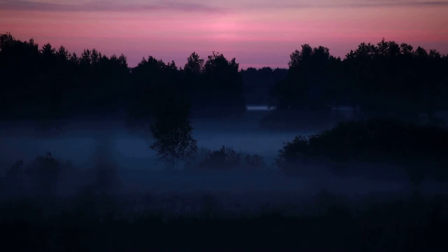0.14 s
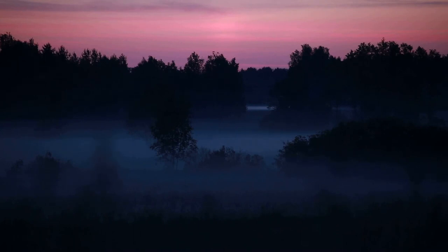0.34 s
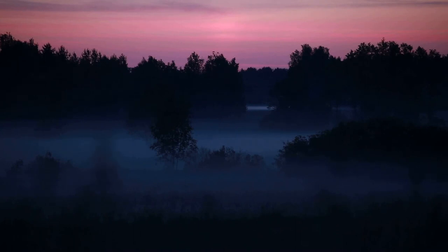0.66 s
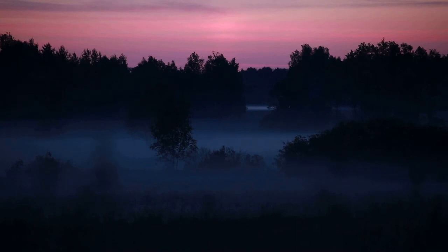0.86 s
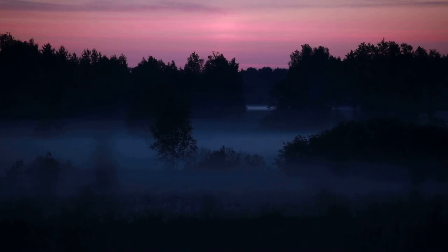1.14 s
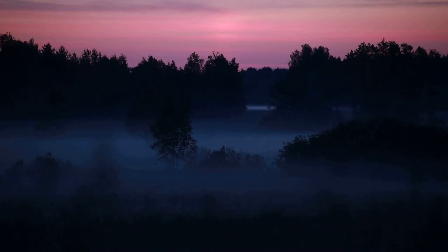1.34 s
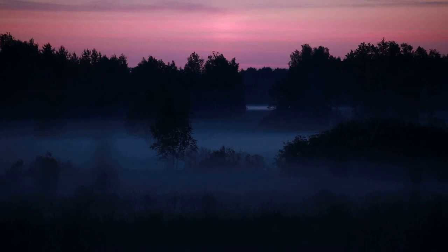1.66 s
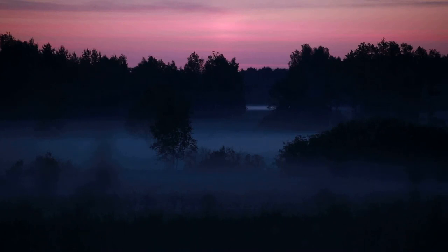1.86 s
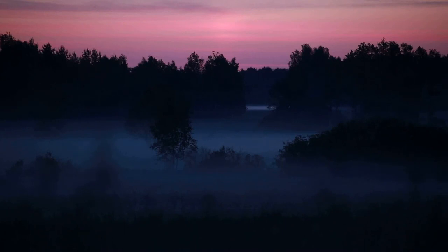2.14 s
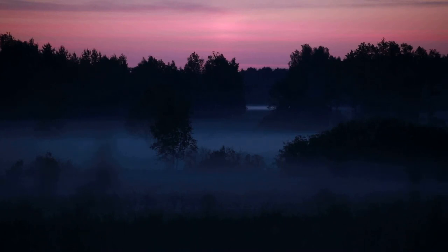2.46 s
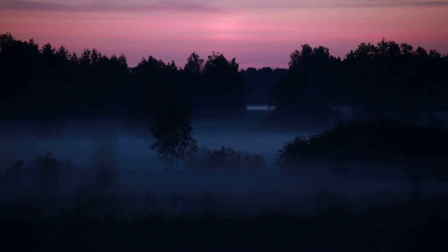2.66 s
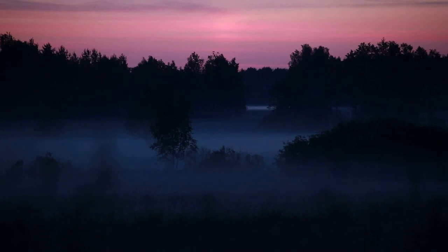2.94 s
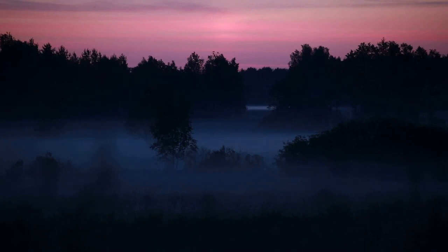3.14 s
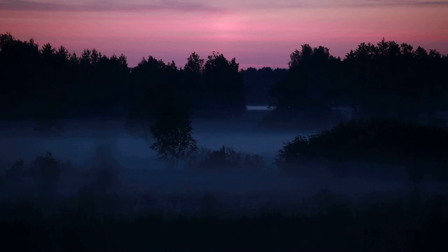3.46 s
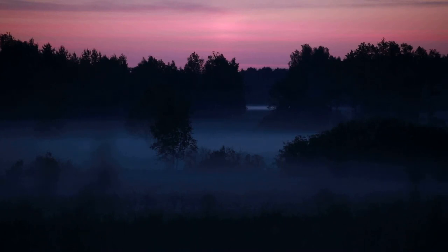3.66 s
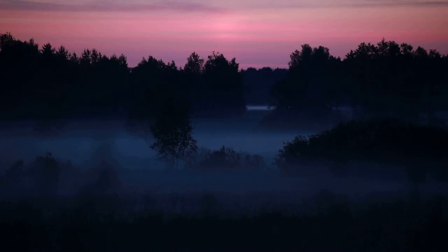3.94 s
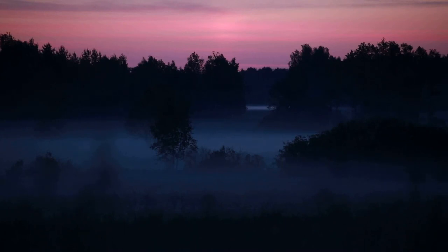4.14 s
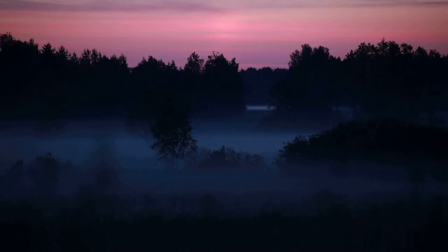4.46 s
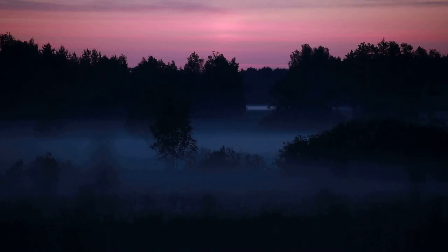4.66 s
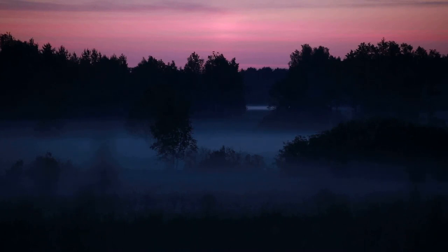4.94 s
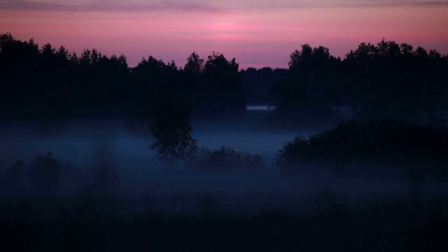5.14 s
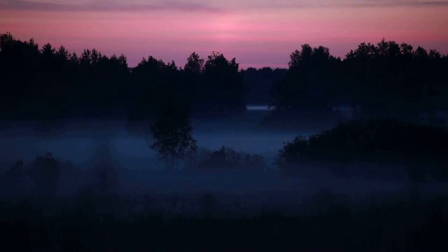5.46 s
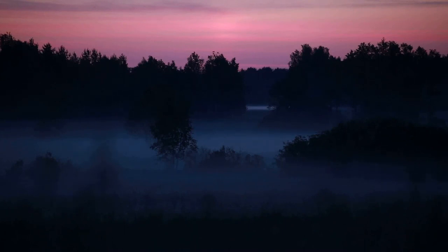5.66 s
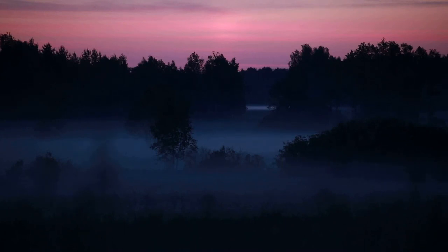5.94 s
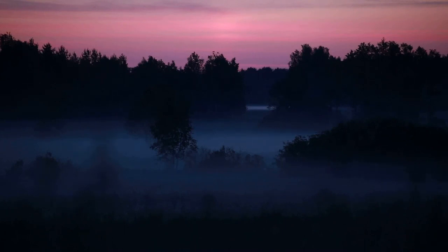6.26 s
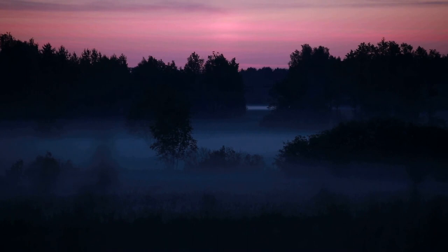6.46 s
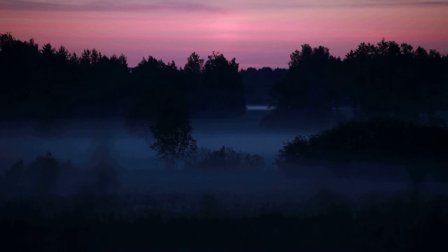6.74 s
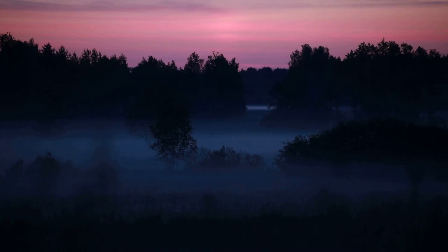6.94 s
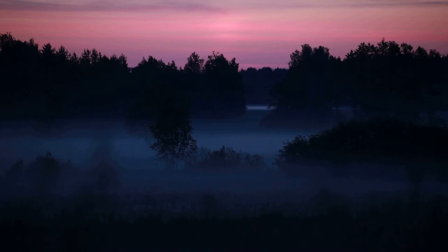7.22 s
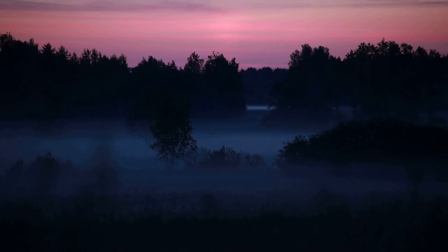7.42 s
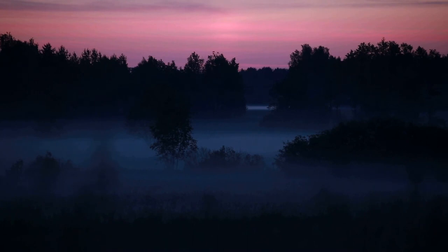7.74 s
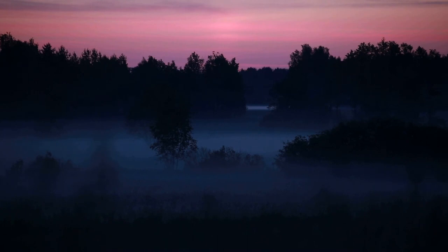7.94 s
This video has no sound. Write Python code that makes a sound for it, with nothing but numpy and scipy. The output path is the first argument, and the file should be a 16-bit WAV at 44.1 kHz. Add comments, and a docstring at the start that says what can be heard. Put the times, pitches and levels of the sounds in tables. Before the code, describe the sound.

A dense dawn chorus of many birds chirping, whistling and trilling over a misty meadow, with frogs ticking faintly beneath and soft airy hiss.

```python
"""Dawn chorus over a meadow ringed by trees, heard through one microphone.
Throughout, land rumble and hiss (shaped noise) lie under a blur of far birds (chance notes in a long echo)
and ticking frogs (resonant clicks); near birds whistle and chirp (gliding sines) from the start.
Thin buzzes join at 0.5 s, falling trills at 1.8 s, scooped notes at 3.2 s, low repeated notes at 4 s and
faint pipes at 4.1 s; sinking pairs of chirps and a near frog's clicks come just before 7 s, then a throb."""
import sys
import numpy as np
from scipy import signal
from scipy.fft import rfft, irfft
from scipy.io import wavfile

SR = 44100
rng = np.random.default_rng(int(sys.argv[2]) if len(sys.argv) > 2 else 0)


def volts_from_decibels(level):
    """Turn decibel levels (scalar or array-like) into linear amplitude factors."""
    exponent = np.asarray(level, float) / 20
    return 10 ** exponent


def generate_wav(sig):
    """Save sig (samples, or channels by samples) to the path in sys.argv[1] as 16-bit PCM at SR."""
    pcm = np.round(np.clip(np.atleast_2d(sig).T, -1, 1) * 32767).astype(np.int16)
    wavfile.write(sys.argv[1], SR, pcm)


N = 356769   # samples


def coloured(x, points):
    """Linear filtering: multiplies the spectrum by a gain drawn on a log-frequency axis."""
    hz, db = np.transpose(points)
    grid_hz = np.arange(N // 2 + 1) * SR / N + 1   # 1 Hz up, to keep the logarithm finite
    gain_db = np.interp(np.log(grid_hz), np.log(hz), db)
    return irfft(rfft(x) * volts_from_decibels(gain_db), N)


def rms_one(x):
    """Normalisation: scales a signal to unit mean power."""
    return x / np.sqrt(np.mean(x ** 2) + 1e-20)


def drift(n, rate):
    """Slow random modulation: normal deviates, rate a second, joined by straight lines."""
    knots = rng.standard_normal(int(n * rate / SR) + 2)
    return np.interp(np.arange(n) * rate / SR, np.arange(len(knots)), knots)


def add(out, start_s, sound):
    """Superposition: sums a sound into the mix from a given moment."""
    at = np.arange(len(sound)) + round(start_s * SR)
    inside = (at >= 0) & (at < N)
    out[at[inside]] += sound[inside]


def syrinx(hz, overtone_db):
    """Frequency modulation: a bird's voice is almost a sine of moving pitch, with a faint octave."""
    phase = 2 * np.pi * (np.cumsum(hz) / SR + rng.random())
    return np.sin(phase) + volts_from_decibels(overtone_db) * np.sin(2 * phase)


def echoes(x, t60_s):
    """Diffuse reverberation: trunks and leaves scatter sound back as a dense, exponentially dying wash."""
    t = np.arange(int(t60_s * SR)) / SR
    onset = np.minimum(t / 0.005, 1)
    wash = rng.standard_normal(len(t)) * volts_from_decibels(-60 * t / t60_s) * onset
    unit_energy = wash / np.sqrt(np.sum(wash ** 2))
    return signal.fftconvolve(x, unit_energy)[:N]


def air():
    """Stationary noise: one smooth spectrum holds land rumble, blurred song and microphone hiss."""
    # relative spectrum of the steady noise: pitch_hz [Hz], density_db [dB per Hz]
    air_colour = [(21, -38), (37, -4), (105, -1), (407, -5.5), (1250, -5.5), (1940, -3.5), (3150, -2),
                  (4390, -6.5), (5520, -16), (6270, -20), (7310, -22.5), (13900, -19.5), (15700, -16)]
    noise = coloured(rng.standard_normal(N), air_colour)
    return volts_from_decibels(-53.5) * rms_one(noise)


def far_chorus(count=1500, wet_db=-2.5, gain_db=-1.5):
    """Random superposition: a swarm of chance notes, dulled by distance and half lost in echo."""
    # overall far level before gain_db: time_s [s], level_db [dB rms]
    far_level = [(0, -51.5), (2, -50), (4, -50.5), (6, -54), (8.09, -54.5)]
    # spectral gain of the distant song: pitch_hz [Hz], gain_db [dB]
    far_colour = [(900, -15), (1500, -11), (2100, 1), (3000, -1.5), (4200, -4.5), (5200, -7.5), (6500, -2),
                  (8000, -50)]
    draw = rng.random((count, 5))
    middle_s = draw[:, 0] * N / SR
    ms = 6.0 * 16.0 ** draw[:, 1] ** 2   # 6 to 96 ms, mostly short
    hz = 1300 * 3.9 ** draw[:, 2]
    glide_hz = 0.597 * hz * (draw[:, 3] - .6)
    # long notes carry more energy, so the far ones that last are the softer
    note_db = 7.5 * draw[:, 4] - 6.1 * np.log10(ms)
    notes = chirps(np.c_[middle_s, ms, hz, glide_hz, note_db])
    heard = coloured(notes + volts_from_decibels(wet_db) * echoes(notes, t60_s=0.66), far_colour)
    s, db = np.transpose(far_level)
    return volts_from_decibels(np.interp(np.arange(N) / SR, s, db) + gain_db) * rms_one(heard)


def frog(per_s=84):
    """Modal resonance: clicks ring the throat sac's short modes; one near frog, ticking behind it."""
    # background ticking, before unevenness and ringing: time_s [s], click_db [dB]
    far_ticks = [(0, -41), (.9, -48), (1.1, -52.5), (3.7, -57), (4.2, -47), (4.8, -47), (5.0, -64),
                 (6.75, -54), (6.9, -48), (7.7, -50), (7.8, -59)]
    # the near frog's loudest clicks, before ringing: start_s [s], click_db [dB]
    near_clicks = [(6.8613, -35), (6.9032, -33), (6.9376, -34.5), (6.9713, -34), (6.984, -35), (7.016, -30),
                   (7.045, -35), (7.1247, -35), (7.148, -34.5), (7.1581, -35), (7.1834, -38), (7.1944, -39),
                   (7.229, -36), (7.2534, -36), (7.29, -36), (7.3024, -37), (7.3272, -32.5),
                   (7.3708, -33.5), (7.4063, -34.5), (7.431, -35), (7.445, -36), (7.47, -39), (7.4828, -33),
                   (7.513, -29.5), (7.5587, -34), (7.587, -32.5), (7.6214, -37), (7.636, -35),
                   (7.6483, -33), (7.6665, -35)]
    # resonances of the throat sac: pitch_hz [Hz], gain_db [dB], t60_s [s]
    sac_modes = [(2120, -.5, .022), (2400, -9.5, 0.0087), (1830, -13, 0.011), (1150, -18, .006)]
    tick_rate = per_s * (1 + .15 * drift(N, 30))
    ticks = np.diff(np.floor(np.cumsum(tick_rate) / SR), prepend=0)   # one at each whole turn
    tick_db = np.interp(np.arange(N) / SR, *np.transpose(far_ticks)) + rng.uniform(-2.28, 6.0, N)
    clicks = 1e-18 + ticks * volts_from_decibels(tick_db)
    s, db = np.transpose(near_clicks)
    clicks[(s * SR).astype(int)] += volts_from_decibels(db)
    soft = signal.lfilter([.3], [1, -.7], clicks)
    out = np.zeros(N)
    for hz, mode_db, t60_s in sac_modes:
        r, w = volts_from_decibels(-60 / (t60_s * SR)), 2 * np.pi * hz / SR   # pole radius and angle
        out += volts_from_decibels(mode_db) * signal.lfilter([0, np.sin(w)], [1, -2 * r * np.cos(w), r * r], soft)
    return signal.sosfilt(signal.butter(3, 1100, "high", fs=SR, output="sos"), out)


def whistled(shape, sung):
    """Transposition: one pitch contour moved to every moment, level and pitch at which it is sung."""
    return [[(s + after, hz + shift, db + below) for after, hz, below in shape] for s, db, shift in sung]


def whistles(edge_s=.004, flutter_db=1.5, waver=0.003):
    """Joint modulation: notes follow drawn pitch lines; air movement makes the level flutter."""
    # held whistles and glides, one list a note: time_s [s], pitch_hz [Hz], level_db [dB rms]
    single_notes = [
        [(0, 2880, -48), (.028, 2830, -52), (.039, 2790, -47), (.065, 2660, -44.5), (.117, 2690, -46.5),
         (.137, 2450, -43), (.147, 2350, -55)],
        [(.169, 4280, -49.5), (.179, 3850, -39), (.206, 3450, -36), (.226, 3340, -42)],
        [(.405, 3020, -47), (.444, 2540, -41), (.468, 2370, -49)],
        [(.605, 2760, -53), (.645, 2645, -45), (.669, 2700, -43), (.688, 2720, -46)],
        [(1.523, 6330, -64), (1.552, 6100, -56), (1.572, 5620, -53), (1.607, 4870, -52.5), (1.651, 4340, -42.1),
         (1.678, 4110, -45), (1.685, 3940, -53.6)],
        [(1.677, 3340, -53.6), (1.693, 3460, -50), (1.721, 3710, -50.4), (1.745, 4490, -60)],
        [(2.509, 3600, -48), (2.521, 3290, -50), (2.538, 2400, -46)],
        [(3.006, 6400, -55), (3.024, 6040, -47), (3.045, 5350, -43), (3.069, 4880, -41), (3.138, 4230, -33),
         (3.161, 4020, -35.5), (3.172, 3780, -45.3)],
        [(3.613, 6930, -57), (3.629, 6070, -50), (3.645, 5600, -59), (3.662, 5950, -54), (3.672, 5910, -60)],
        [(3.678, 5090, -47), (3.697, 3940, -43), (3.708, 3510, -37.5), (3.716, 3330, -57)],
        [(3.761, 3050, -60), (3.777, 3060, -42), (3.798, 3700, -42), (3.808, 3800, -41)],
        [(3.886, 3440, -48), (3.898, 3640, -42), (3.921, 3400, -44)],
        [(4.865, 6280, -59), (4.911, 5240, -46.5), (4.94, 4700, -45), (4.995, 4300, -33), (5.015, 3940, -46)],
        [(5.262, 3790, -46), (5.269, 3790, -42), (5.275, 4050, -46.5), (5.287, 3350, -43.5), (5.298, 2600, -49)],
        [(5.545, 4550, -46), (5.551, 4120, -35), (5.559, 4450, -41), (5.569, 3700, -35), (5.583, 2450, -48)],
        [(6.515, 4620, -45), (6.523, 4970, -45.5), (6.55, 4630, -38.5), (6.569, 4470, -43.4),
         (6.583, 4610, -41)],
        [(6.516, 3250, -45), (6.53, 3550, -41.5), (6.542, 3190, -39.5), (6.574, 2880, -42), (6.587, 2430, -45),
         (6.6, 2360, -41), (6.62, 2400, -44)],
        [(6.682, 6300, -50), (6.693, 5350, -41), (6.702, 4450, -38), (6.712, 4080, -41), (6.723, 3700, -48)],
        [(6.571, 3340, -47.8), (6.585, 3620, -36.5), (6.623, 3830, -41), (6.635, 3770, -50)],
        [(6.649, 1835, -49), (6.678, 1826, -45.5), (6.734, 1800, -48), (6.769, 1800, -42.5), (6.804, 1758, -49)],
        [(6.723, 2740, -51), (6.744, 2990, -44), (6.757, 3490, -38)],
        [(6.738, 5040, -41), (6.746, 4350, -46), (6.76, 3900, -38), (6.775, 3400, -44)],
        [(6.87, 4500, -46), (6.884, 5410, -52.4), (6.891, 5540, -53.5), (6.902, 4480, -47), (6.906, 4300, -53)],
        [(7.158, 1540, -56), (7.22, 1560, -47.5), (7.255, 1570, -55), (7.266, 1350, -50)],
        [(7.285, 4090, -42), (7.31, 4260, -35), (7.322, 4150, -45)],
    ]
    # low note whose level dips briefly: after_s [s from start], pitch_hz [Hz], below_db [dB over sung level]
    coo_shape = [(0, 1622, -9), (.018, 1740, -0.5), (.033, 1707, -1.5), (.038, 1690, -11),
                 (.044, 1640, -2.5), (.056, 1640, -14)]
    # when it is sung: start_s [s], level_db [dB rms], shift_hz [Hz]
    coo_times = [(1.02, -42, 0), (1.643, -41.5, 0), (2.271, -40.5, 0)]
    # steep fall: after_s [s from start], pitch_hz [Hz], below_db [dB over sung level]
    drop_shape = [(0, 4650, -11), (.005, 4140, -2), (.015, 3710, -0.5), (.027, 3120, -4), (.035, 2500, -10)]
    # when it is sung: start_s [s], level_db [dB rms], shift_hz [Hz]
    drop_times = [(5.332, -38, 0), (5.404, -37.5, -50), (5.478, -37.5, 50)]
    # fall that levels out: after_s [s from start], pitch_hz [Hz], below_db [dB over sung level]
    hook_shape = [(0, 5130, -24), (.004, 4510, -5.5), (.011, 3950, 0), (.022, 3800, 0.5), (.029, 3873, -14)]
    # when it is sung: start_s [s], level_db [dB rms], shift_hz [Hz]
    hook_times = [(5.615, -36, 50), (5.709, -40.5, 0), (5.814, -41.5, 0), (5.923, -41, 0)]
    # quick rise, then held: after_s [s from start], pitch_hz [Hz], below_db [dB over sung level]
    answer_shape = [(0, 2654, -6), (.007, 3390, -2), (.018, 3450, -1), (.03, 3450, -11)]
    # when it is sung: start_s [s], level_db [dB rms], shift_hz [Hz]
    answer_times = [(5.651, -44, 0), (5.744, -44, -150), (5.851, -41.5, 0), (5.957, -39, 140)]
    notes = single_notes + whistled(coo_shape, coo_times) + whistled(drop_shape, drop_times)
    notes = notes + whistled(hook_shape, hook_times) + whistled(answer_shape, answer_times)
    out = np.zeros(N)
    for note in notes:
        s, hz, db = np.transpose(note)
        t = np.arange(s[0] - edge_s, s[-1] + edge_s, 1 / SR)
        edges = np.clip(np.minimum(t - t[0], t[-1] - t) / (2 * edge_s), 0, 1)
        level = np.sqrt(2) * volts_from_decibels(np.interp(t, s, db) + flutter_db * drift(len(t), 130))   # rms to peak
        pitch = np.interp(t, s, hz) * (1 + waver * drift(len(t), 140))
        add(out, t[0], edges * level * syrinx(pitch, overtone_db=-43.0))
    return out


def chirps(rows, flutter_db=1.5):
    """Amplitude envelope: each note swells and fades as it glides; long ones stay full in the middle."""
    out = np.zeros(N)
    for middle_s, ms, hz, glide_hz, db in rows:
        u = np.linspace(-.5, .5, int(ms * SR / 1000))   # place within the note
        swell = np.minimum(np.cos(np.pi * u) * max(1, ms / 45) ** .5, 1) ** 2
        level = volts_from_decibels(db + flutter_db * drift(len(u), 60)) * swell
        add(out, middle_s - ms / 2000, level * syrinx(hz + glide_hz * u, overtone_db=-40.0))
    return out


def single_chirps():
    """Linear glide: separate notes that swell and fade while the pitch moves evenly."""
    # single notes: middle_s [s], length_ms [ms], pitch_hz [Hz], glide_hz [Hz over the note], level_db [dB peak]
    single_rows = [(.0204, 16, 1600, 0, -40.5), (.03, 110, 1600, -120, -50), (.278, 11, 6500, 1300, -49),
                   (.286, 10, 6570, 1300, -45), (.303, 36, 6600, -400, -49), (.285, 100, 1320, 20, -54),
                   (.35, 108, 2665, 40, -49.5), (.362, 39, 5160, 50, -54), (.3837, 27, 3450, -800, -36.5),
                   (.475, 70, 1550, -60, -52), (.565, 95, 3220, 600, -54), (.215, 470, 4805, -100, -62),
                   (.575, 410, 4720, -120, -60), (.893, 103, 3600, 330, -45.5), (.925, 130, 3130, 150, -50),
                   (1.06, 120, 4050, 450, -55), (1.125, 95, 2560, 10, -51), (1.205, 160, 1965, -220, -52),
                   (1.255, 100, 3510, 402, -47.5), (1.2889, 12, 2690, -800, -37),
                   (1.45, 150, 4190, 690, -55), (1.645, 83, 3235, 410, -52), (1.715, 65, 2390, 0, -47),
                   (1.77, 144, 1965, -190, -52), (1.905, 46, 2650, -1020, -43), (1.955, 110, 5450, 50, -64),
                   (2.185, 46, 3260, -1120, -48), (2.32, 56, 4220, -300, -54), (2.385, 10, 2400, -900, -41),
                   (2.4, 57, 2590, -100, -48), (2.44, 16, 2400, -400, -44), (2.6034, 7.5, 2980, -800, -36),
                   (2.6179, 4.1, 3420, -290, -32), (2.685, 44, 3390, -150, -36.5),
                   (2.725, 33, 1970, -1180, -47.5), (2.7297, 7, 4550, 800, -33),
                   (2.7382, 8.2, 4430, 400, -28.5), (2.7461, 11.3, 4350, 0, -28),
                   (2.7536, 12.7, 4060, -200, -31.8), (2.94, 150, 3820, 456, -53),
                   (2.9611, 23, 5050, 0, -40.5), (3.03, 33, 1910, -1180, -49), (3.0412, 35, 6250, 900, -47),
                   (3.098, 37, 1940, -1220, -50), (3.15, 120, 3220, -1200, -53),
                   (3.198, 30, 4340, 570, -40.5), (3.275, 20, 2900, 300, -45),
                   (3.281, 12, 6200, -1800, -47), (3.299, 28, 6450, 150, -46),
                   (3.3063, 12, 1890, -1300, -36.5), (3.4001, 24, 2970, 800, -44),
                   (3.441, 50, 3230, 300, -38), (3.485, 40, 5070, -1900, -49.5),
                   (3.495, 50, 5900, -1700, -60), (3.505, 40, 3350, -220, -48),
                   (3.525, 30, 2410, -500, -45), (3.63, 41, 4310, 880, -54.5), (3.832, 7, 3650, -600, -42),
                   (3.7329, 11, 3530, -510, -34), (3.84, 78, 2550, -400, -48), (3.85, 33, 5260, 950, -52),
                   (3.873, 26, 4700, -750, -39), (3.927, 14, 3920, 400, -36.5), (3.95, 62, 3290, 90, -48),
                   (4.003, 73, 2760, -220, -42.5), (4.085, 33, 2370, 0, -43), (4.105, 7.2, 2950, 100, -34),
                   (4.1255, 6.3, 2660, 200, -34), (4.38, 410, 4915, -290, -64), (4.45, 108, 4470, -50, -59),
                   (4.75, 370, 4780, -100, -61), (4.934, 12, 4950, 0, -37), (4.942, 98, 2450, 950, -53),
                   (4.982, 41, 2435, -610, -55), (5.165, 71, 2690, -80, -51), (5.175, 196, 3510, -180, -57),
                   (5.62, 70, 3330, -100, -51), (5.7, 90, 3430, 0, -55), (5.24, 90, 3500, -100, -53),
                   (5.787, 39, 3230, -100, -46), (6.02, 130, 1825, -190, -53), (6.05, 110, 2630, 50, -53),
                   (6.065, 90, 3030, -100, -43), (6.085, 60, 1760, 20, -48), (6.16, 110, 1790, 6, -50),
                   (6.245, 79, 2800, -90, -52), (6.438, 6, 5000, -1500, -46), (6.46, 17.6, 2550, -200, -42),
                   (6.465, 6, 4900, -1500, -46), (6.491, 7, 4850, -1500, -49), (6.596, 23, 4630, -200, -35),
                   (6.614, 20, 4770, -100, -36.6), (6.633, 24, 5110, -200, -41),
                   (6.6515, 24, 5360, -200, -45), (6.6637, 14, 6030, -700, -49),
                   (6.68, 110, 2585, -90, -54.5), (6.7121, 16, 5830, -1300, -45), (6.7255, 7, 6150, 0, -46),
                   (6.845, 127, 1807, -87, -51), (6.8802, 8, 3190, 500, -34), (6.99, 280, 2012, 301, -51.5),
                   (7.05, 383, 4750, -140, -64), (7.05, 65, 1350, 50, -48), (7.091, 8, 2600, 900, -45),
                   (7.091, 35, 2240, -300, -43), (7.117, 83, 1260, 50, -50), (7.135, 46, 3760, -900, -54),
                   (7.2181, 7.5, 4420, 600, -34), (7.305, 96, 1010, -79, -58), (7.34, 116, 2930, 162, -50),
                   (7.695, 58, 2855, -10, -47), (7.75, 110, 2365, 92, -54), (7.795, 45, 2820, -100, -50),
                   (7.885, 36, 4900, 0, -56), (7.968, 6, 3700, 300, -43), (7.9793, 6.6, 3820, 490, -34),
                   (7.9915, 9, 3810, 900, -33.5), (8.0047, 10, 3300, 700, -36), (8.015, 40, 4800, 0, -53),
                   (8.0178, 4.8, 2760, -100, -33), (8.03, 6.5, 2500, -300, -40),
                   (8.082, 25, 2740, -1200, -42)]
    return chirps(single_rows)


def repeated(group, sung):
    """Time scaling: one group of chirps, moved in time, pitch, level and pace."""
    return [(s + after * slow, ms * slow, hz + step, glide, db + over)
            for s, hz, db, slow in sung for after, ms, step, glide, over in group]


def phrases():
    """Repetition: birds sing fixed groups of short chirps again and again."""
    # Groups: after_s [s from first], length_ms [ms], step_hz [Hz from first], glide_hz [Hz], over_db [dB];
    # after_s and length_ms are as written, before slowness.
    # Their times: start_s [s], pitch_hz [Hz], level_db [dB peak, before over_db], slowness [1 = as written].
    # three quick chirps, the last lower and falling
    triplet, triplet_times = [(0, 9.5, 0, 180, -0.5), (.0114, 8.1, 50, 200, 1), (.0228, 7.2, -460, -700, 0)], [(-.0003, 4130, -31, 1), (.048, 4140, -31, 1),
                                               (0.0965, 4180, -29, 0.97), (.1447, 4230, -29, 0.99),
                                               (.194, 4230, -33, 1), (.2417, 4170, -34, 1),
                                               (.2914, 4140, -34, 1), (.3402, 4180, -31.5, 1),
                                               (.3899, 4140, -32.5, 1)]
    # nine chirps stepping down
    cascade, cascade_times = [(0, 7, 0, -450, 0), (.0165, 6.5, -30, -450, 4), (.033, 7, -110, -380, 4),
                              (.0487, 7.2, -320, 50, 4.5), (.0623, 7.8, -560, 380, 2.5),
                              (.0753, 8, -780, 400, 1.5), (.0873, 6.5, -1050, 820, 2.5),
                              (.1, 9, -1360, 750, -0.5), (.1135, 7.4, -1500, 600, -8)], [(.5826, 4000, -38, 1.02), (.7562, 3940, -37, .99),
                                               (0.917, 4070, -35.5, 0.98), (1.112, 4000, -37, .985),
                                               (1.2886, 3950, -37.5, .99)]
    # eleven chirps, mostly rising, on a sinking line
    jingle, jingle_times = [(0, 8.6, 0, 550, 0), (.0169, 11, -270, 490, 1.5), (.034, 8.4, -780, 1100, -.5),
                            (.0447, 7.3, -860, 1100, -1.5), (.0547, 8, -960, 1300, 0),
                            (.0649, 5.5, -910, 950, 1), (.075, 5.8, -960, 1150, -3),
                            (.103, 27, -580, -750, 2), (.1304, 8, -1030, 350, 2.5),
                            (.15, 14.5, -1220, 400, -0.5), (.1648, 12, -1620, 650, -1)], [(4.2486, 4443, -33, 1.012), (4.5055, 4354, -33.5, .988)]
    # a rising chirp and a falling one
    up_down, up_down_times = [(0, 11, 0, 550, 0), (.011, 8.5, -400, -1600, 0)], [(2.2535, 4530, -42.5, 0.91), (2.283, 4200, -37, 1),
                                               (2.317, 3420, -38, 1.15), (2.352, 2970, -36.5, .93)]
    # two overlapping falling ticks
    twin_tick, twin_tick_times = [(0, 3.8, 0, -500, 0), (.0033, 4.1, -180, -1600, 2)], [(2.634, 4170, -30.5, 0.95), (2.656, 4440, -31, 0.93),
                                                     (2.6752, 4740, -33.5, 0.95)]
    # one short rising chirp
    flick, flick_times = [(0, 8.5, 0, 800, 0)], [(2.767, 3360, -34.5, 1.3), (2.7838, 2880, -35, 1.3),
                                         (2.8042, 2650, -35, 1.1), (2.8254, 2670, -40, 1.2),
                                         (2.846, 2580, -39, 1.2), (2.866, 2600, -46, 1.1),
                                         (3.9586, 4080, -36.5, .8), (3.9835, 3860, -34, .7),
                                         (4.0085, 3770, -34, .8), (4.0339, 3690, -33, .85),
                                         (4.058, 3640, -32, .85), (4.082, 3450, -33.5, .8)]
    rows = repeated(triplet, triplet_times) + repeated(cascade, cascade_times)
    rows += repeated(up_down, up_down_times) + repeated(twin_tick, twin_tick_times)
    rows += repeated(flick, flick_times) + repeated(jingle, jingle_times)
    return chirps(rows)


def buzzes(per_s=180, spread_hz=220, rise_hz=300):
    """Amplitude modulation: high hoarse notes, rising a little, chopped into rapid pulses."""
    # thin buzzes: middle_s [s], length_ms [ms], pitch_hz [Hz], level_db [dB peak]
    buzz_rows = [(.6, 110, 7300, -65), (4.19, 60, 6500, -68), (4.385, 60, 6500, -63), (4.58, 77, 6600, -61),
                 (4.775, 70, 6600, -59), (4.965, 70, 6550, -59), (5.15, 95, 6550, -60)]
    out = np.zeros(N)
    for middle_s, ms, hz, db in buzz_rows:
        u = np.linspace(-.5, .5, int(ms * SR / 1000))
        shake = np.cos(np.pi * per_s * u * ms / 1000) ** 2
        pitch = hz + rise_hz * u + spread_hz * drift(len(u), 936)
        sound = volts_from_decibels(db) * np.cos(np.pi * u) * shake * syrinx(pitch, overtone_db=-60)
        add(out, middle_s - ms / 2000, sound)
    return out


def pulse_train(rows, longest_s):
    """Phase accumulation: times, pitch and level lines, place in each pulse (-.5 to .5), pulse lengths."""
    s, hz, db = np.transpose(rows)
    t = np.arange(s[0] - (s[1] - s[0]) / 8, s[-1], 1 / SR)   # from half a pulse ahead
    pulses = np.interp(t, [t[0], *s], [-.5, *(4 * np.arange(len(s)))])   # four pulses a row
    period = 1 / (np.gradient(pulses) * SR)
    u = (pulses + .5) % 1 - .5
    u = np.clip(u * np.maximum(1, period / longest_s), -.5, .5)   # slow pulses leave gaps
    level = volts_from_decibels(np.interp(t, s, db) + 1.4 * drift(len(t), 60))
    return t, np.interp(t, s, hz), level, u, np.minimum(period, longest_s)


def trills(fullness=.8):
    """Periodic frequency sweep: pulses flick up to a falling line, steeply at first; longer ones more."""
    # fast falling trills, one list each, a row every fourth pulse: time_s [s], pitch_hz [Hz], level_db [dB peak]
    trill_lines = [
        [(1.781, 4250.0, -41), (1.834, 3850.0, -37.5), (1.8905, 3520.0, -38.5), (1.9495, 2970.0, -38.0),
         (2.011, 2720.0, -38.0), (2.072, 2600.0, -47)],
        [(6.107, 5120.0, -45.8), (6.126, 5010.0, -42.1), (6.1445, 4850.0, -41.1), (6.1645, 4610.0, -40.2),
         (6.188, 4350.0, -35.3), (6.219, 4120.0, -33.8), (6.253, 3790.0, -33.6), (6.285, 3670.0, -34.9),
         (6.32, 3520.0, -34.5), (6.357, 3260.0, -37.8), (6.3903, 3050.0, -45)],
        [(7.357, 3780.0, -40.1), (7.39, 3490.0, -36.2), (7.425, 3240.0, -38.0), (7.461, 3090.0, -37.2),
         (7.4983, 3100.0, -45)],
        [(7.614, 4990.0, -46.3), (7.632, 4870.0, -41.1), (7.65, 4690.0, -40.1), (7.668, 4480.0, -38.5),
         (7.687, 4340.0, -37.8), (7.718, 4140.0, -36.6), (7.754, 3880.0, -35.9), (7.794, 3650.0, -35.2),
         (7.832, 3410.0, -37.5), (7.8693, 3240.0, -51.1)],
    ]
    out = np.zeros(N)
    for line in trill_lines:
        t, hz, level, u, length_s = pulse_train(line, longest_s=.0092)
        left = .5 - u   # share of the pulse still to come
        flick_hz = length_s * (17000 - 85000 * left ** 3 - 21250 * left)
        add(out, t[0], level * np.cos(np.pi * u) ** fullness * syrinx(hz + flick_hz, overtone_db=-48.0))
    return out


def scoops(fall=0.47, rise=.2, turn=-0.0985):
    """Periodic pitch bend: each note drops fast, turns and climbs back a little."""
    # scooped trill, a row at every fourth note: time_s [s], lowest_hz [Hz], level_db [dB peak]
    scoop_line = [(3.228, 3800, -30), (3.283, 3550, -30), (3.340, 3000, -36), (3.398, 2550, -35),
                  (3.454, 2500, -39)]
    out = np.zeros(N)
    t, hz, level, u, _ = pulse_train(scoop_line, longest_s=0.0091)
    bend = np.interp(u, [-.5, turn, .5], [1 + fall, 1, 1 + rise])
    add(out, t[0], level * np.cos(np.pi * u) * syrinx(hz * bend, overtone_db=-37.0))
    return out


def chucks(ms=30, pitch_hz=2000, fall_hz=1450, echo_db=-12.0, echo_s=.011):
    """Discrete reflection: one short low falling note, again and again, doubled by a close echo."""
    # the repeated low note: middle_s [s], level_db [dB peak]
    chuck_times = [(3.952, -39.5), (4.068, -41.5), (4.179, -39.5), (4.295, -44), (4.414, -36), (4.527, -39),
                   (4.65, -38.5), (4.761, -44), (4.866, -49), (4.971, -48), (5.072, -47), (5.175, -47),
                   (5.275, -50), (5.375, -50), (5.474, -48.5)]
    notes = chirps([(s, ms, pitch_hz, -fall_hz, db) for s, db in chuck_times], flutter_db=3.5)
    return notes + volts_from_decibels(echo_db) * np.roll(notes, round(echo_s * SR))


def pipes(start_s=4.093, gap_s=.195, ms=67, hz=5060, fall_hz=240, first_db=-58.5, swell_db=1.5):
    """Level growth with nearness: a thin falling pipe, six times at an even pace, coming nearer."""
    return chirps([(start_s + gap_s * k, ms, hz, -fall_hz, first_db + swell_db * k) for k in range(6)])


def sinking_pairs():
    """Quadratic pacing: ten pairs of rising chirps that sink, fade and hurry."""
    rows = []
    for k in range(10):
        first_s = 6.7716 + .0338 * k - .00019 * k ** 2
        second_s = first_s + .011 + .00045 * k   # the lag grows
        hz = 4317 - 278 * k + 8.3 * k ** 2   # the sinking eases
        db = -27.5 - 1.0 * k
        rows += [(first_s, 9.5, hz, 800, db), (second_s, 14.5, hz, 1010, db - 2.0)]
    return chirps(rows)


def throbs(start_s=7.2275, gap_s=0.011, ms=14, hz=4110, fall_hz=300, db=-34):
    """Overlapping envelopes: a whistle throbs five times on one pitch before it is held."""
    return chirps([(start_s + gap_s * k, ms, hz, -fall_hz, db) for k in range(5)])


def scene():
    """Superposition: near singers with their tree echo, the far chorus and the air, alike on both sides."""
    near = frog() + whistles() + single_chirps() + phrases() + buzzes() + trills() + scoops()
    near = near + chucks() + pipes() + sinking_pairs() + throbs()
    mono = air() + far_chorus() + near + volts_from_decibels(-13) * echoes(near, t60_s=0.24)
    return np.stack([mono, mono])


def band_limit(x):
    """A steep low-pass at the top of the band."""
    return signal.sosfilt(signal.butter(12, 15890, fs=SR, output="sos"), x)


def record(dry):
    """Low-pass filtering: the single microphone signal, on both channels, loses its very top."""
    low_pass = signal.cheby2(12, 60, 16050, fs=SR, output="sos")   # 60 dB down from 16050 Hz
    top_cut = signal.sosfilt(low_pass, dry)
    return band_limit(top_cut)


dry = scene()
out = record(dry)
generate_wav(out)
```